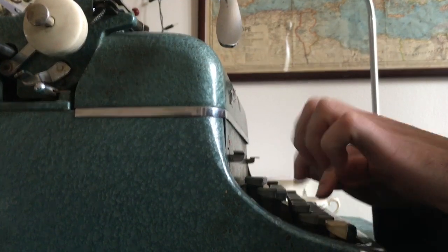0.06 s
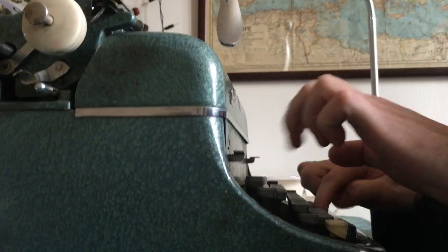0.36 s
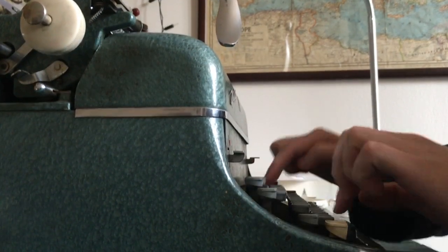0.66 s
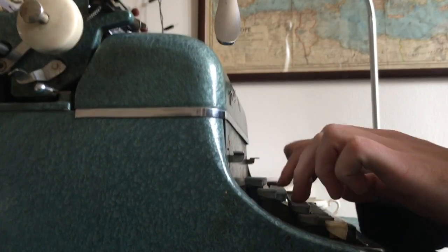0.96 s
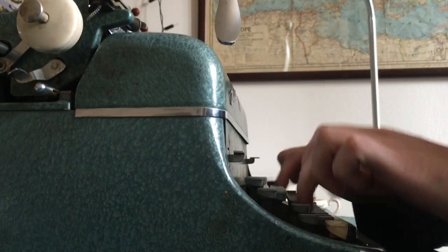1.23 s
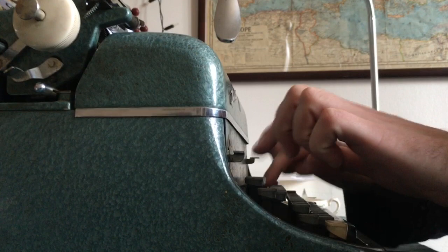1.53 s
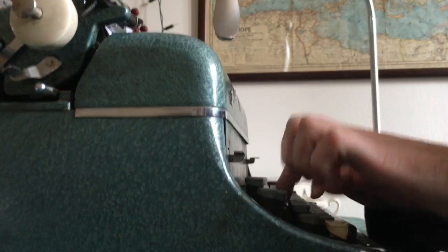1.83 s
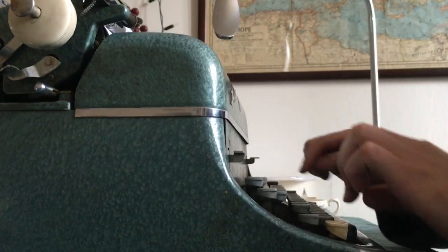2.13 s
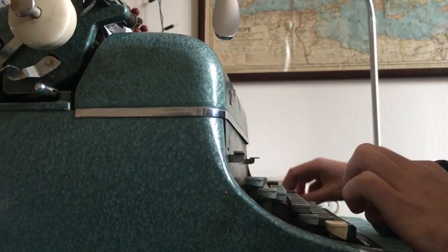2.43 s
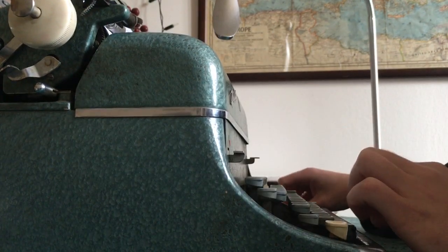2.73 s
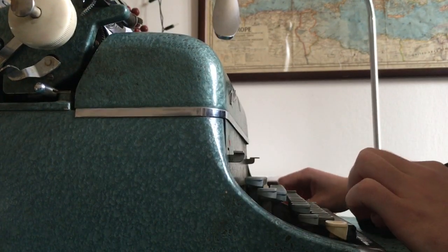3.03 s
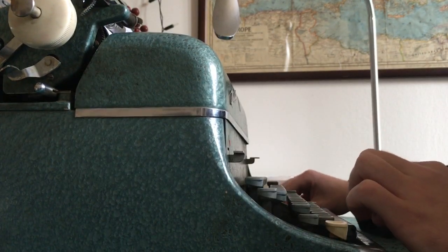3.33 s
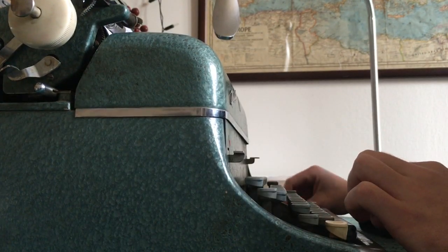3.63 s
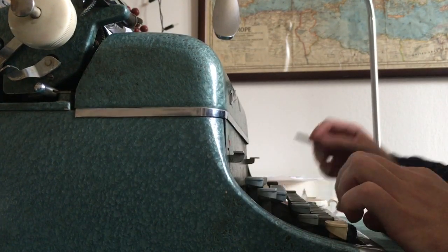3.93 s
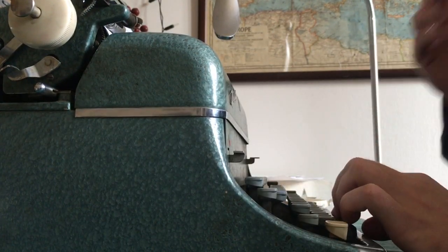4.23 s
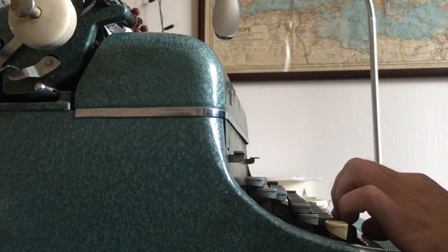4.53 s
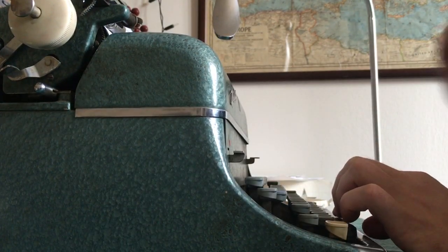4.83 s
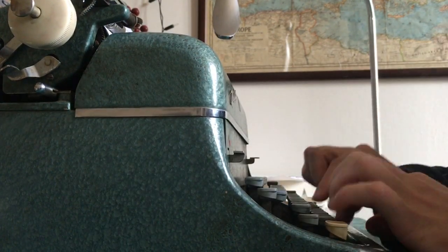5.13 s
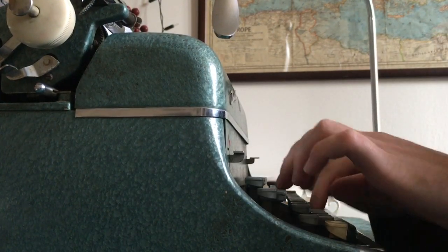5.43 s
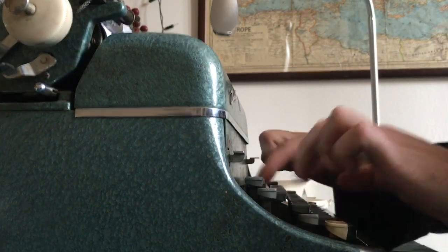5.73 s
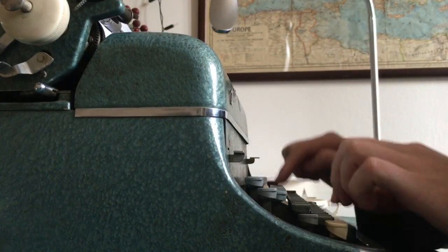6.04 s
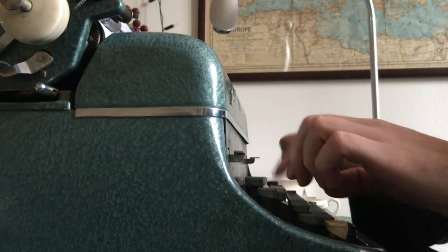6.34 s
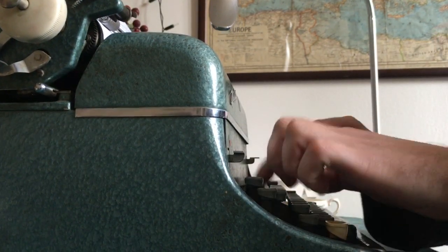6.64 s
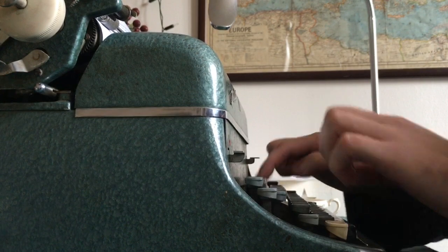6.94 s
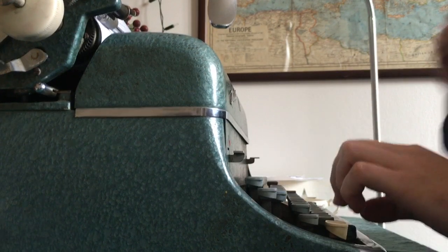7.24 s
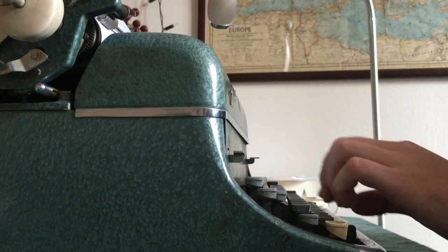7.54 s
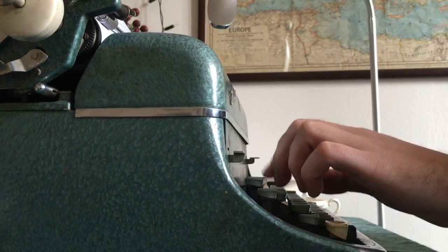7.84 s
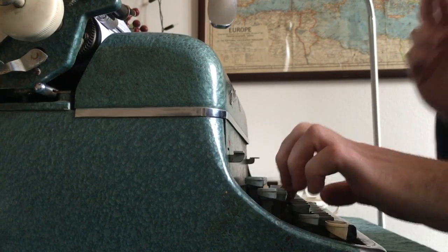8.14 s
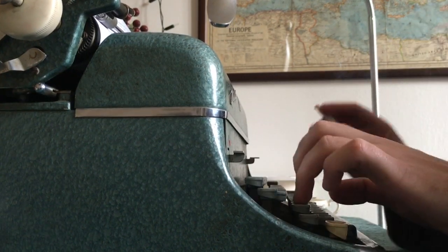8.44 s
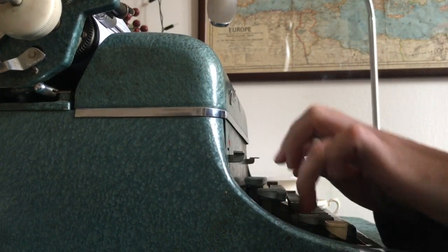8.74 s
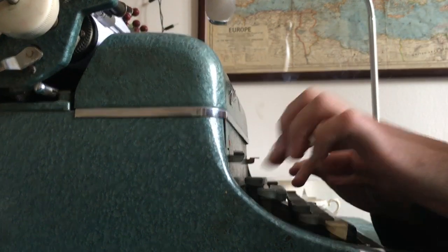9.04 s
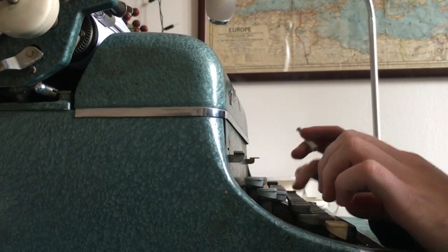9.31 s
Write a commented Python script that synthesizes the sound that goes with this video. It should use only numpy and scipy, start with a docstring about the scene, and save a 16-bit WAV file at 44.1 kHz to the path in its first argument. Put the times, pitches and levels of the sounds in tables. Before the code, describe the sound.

A heavy manual typewriter is heard close up in a small, quiet room. Keys snap sharply in an uneven burst, each with a light metal rattle and a low thump through the desk. A soft knock falls in a pause of about three seconds. Then a space bar thud leads into more typing, which slows to a few separate strokes. A faint, high metallic ring lingers underneath.

```python
"""Sharp slaps of two-finger typing: a heavy manual typewriter on a desk in a small, quiet room,
the microphone close beside it. For each letter a finger meets the key, the escapement swishes,
and the typebar slaps the platen and falls back. The space bar thuds and lets the carriage jump.
Underneath, the blows rock the case on the desk and shake the margin bell into a faint beating ring."""
import sys
import numpy as np
from scipy import signal
from scipy.fft import rfft, irfft
from scipy.io import wavfile

SR = 44100
rng = np.random.default_rng(int(sys.argv[2]) if len(sys.argv) > 2 else 0)


def file_out(sig):
    """Save sig as 16-bit WAV at sys.argv[1]."""
    # one column per channel
    cols = np.atleast_2d(sig).T
    # limit, then scale
    lim = np.clip(cols, -1, 1)
    pcm = np.round(lim * 32767).astype(np.int16)
    wavfile.write(sys.argv[1], SR, pcm)


N = 422037
BLOW_SAMPLES = 32768
AGE_S = np.arange(BLOW_SAMPLES) / SR
BIN_HZ = np.maximum(np.arange(BLOW_SAMPLES // 2 + 1) * SR / BLOW_SAMPLES, 1)

# Levels in the tables are relative; each layer adds its own gain.
# typebar strikes on the platen: start_s, level_db, key_travel_s, fall_back_s
LETTERS = [(-0.11, 1.5, 0.014, 0.11), (0.1087, -3, 0.04, 0.089), (0.3586, 1, 0.036, 0.11),
           (0.4895, -2, 0.025, 0.088), (0.7391, 1.5, .016, .122), (1.2862, 1, 0.035, 0.13),
           (1.3893, -2, 0.055, 0.11), (1.632, 1, 0.026, 0.092), (1.7501, -3, .028, 0.1),
           (1.9276, 0.5, .022, 0.096), (5.605, 2.5, .041, 0.12), (5.7399, -1.5, .025, 0.12),
           (5.898, -0.5, 0.02, 0.084), (6.392, 0, .029, .11), (6.588, 1, 0.018, 0.11),
           (6.794, 0, 0.023, 0.12), (7.1066, -1, .026, 0.088), (8.259, -0.5, 0.031, 0.13),
           (8.765, -1, 0.04, 0.15), (9.057, -0.5, 0.022, 0.12)]
# space bar meeting its stop: start_s, level_db, held_s
SPACES = [(0.8557, 1, 0.089), (5.216, 0.5, 0.093), (6.049, -4, .088)]
# a key knocking without printing: start_s, level_db
NUDGES = [(2.52, -18.5), (2.572, -23)]
# stray ticks while the hands rest: start_s, thin_db, knock_db
STRAY_TICKS = [(4.452, -51, -81), (7.951, -77, -58), (8.097, -87, -64), (8.486, -58, -72)]
# strokes that shake the bell anew: start_s, hum_db, upper_partial_db, beat_depth (0-1)
BELL_SHAKES = [(-0.11, -42.5, -55.5, 0), (.358, -41.5, -63.5, .1), (1.286, -55.5, -45, .2),
               (1.928, -55, -51.5, .5), (5.605, -52, -51.5, .35), (6.392, -46, -51.5, 0.5),
               (7.109, -61.5, -61.5, 0), (8.259, -59.5, -56.5, 0), (8.765, -43.5, -58, .05)]
# margin bell partials: pitch_hz, beat_hz, t60_s
BELL_PARTIALS = [(2722, 4.1, 5.6), (6444, 5, 1.9)]

# ringing modes of each part: pitch_hz, level_db, t60_s
CASE_MODES = [(57, -1.5, 0.57), (110.4, -2, 0.4), (158.4, -4.5, .2), (203.5, -2.5, 0.3), (242, -6.5, 0.2),
              (314.7, -1, 0.47), (414, -8, .3), (443.5, -4, 0.3), (608.2, -3, .2), (770, -22.5, 1.4),
              (847, -9, 0.43)]  # case and desk together
NUDGE_MODES = [(170, -8.5, 0.41), (307, -0.5, 0.33), (338.4, 4, 0.16), (1000, 10.5, 0.05), (1287, -2, 0.13),
               (2250, 0, 0.12)]  # the nudged key's lever
BAR_MODES = [(160.2, -1, 0.14), (319, -7, 0.46), (797, -6.5, 0.076), (1042, -3.5, 0.074), (1237, 11.5, .09),
             (1440, 0, 0.13), (1600, -3.5, 0.092), (2300, 3.5, .12)]  # space bar
RACK_MODES = [(2230, -0.5, 0.13), (2389, -7.5, .08), (3050, 9.5, 0.029), (3150, 4, 0.025),
              (4190, 5.5, 0.036), (5150, -4.5, .06), (6940, -11, .05), (7360, -6, .05),
              (8400, -19.5, 0.046), (11200, -3.5, .07), (11500, -15, .06), (11900, -14, .06),
              (13600, -9, 0.0567)]  # carriage rack
LEVER_MODES = [(1310, -5.5, .05), (1450, -1.5, .06)]  # key lever
TYPEBAR_MODES = [(800, -7.5, 0.055), (973, -6, 0.035), (1220, -0.5, 0.074), (1420, -2, .06),
                 (1687, -0.5, 0.068), (1860, -6.5, 0.034)]  # typebars and their segment

# noise spectra at the microphone: frequency_hz, level_db
ROOM_TONE = [(20, -34), (35, -12), (59, 1), (100, -6), (145, -12), (236, -3.5), (310, -10), (520, -17.5),
             (900, -19.5), (2000, -24.5), (4000, -30.5), (12500, -35.5), (16000, -40)]  # the quiet room
DESK_BOOM = [(22, -18), (38, -4), (58, -3.5), (85, 0.5), (150, -8.5), (300, -8), (500, -6), (1000, -42.5)]  # case rocking on the desk
LINK_TICK = [(800, -28.5), (3000, -18), (7000, -8), (11500, 6), (15500, -2.5)]  # loose links
KEY_KNOCK = [(100, -13), (330, 2), (550, 1), (1100, -5.5), (3000, -4.5), (5000, -18), (8000, -18.5),
             (15000, -27)]  # nudged key
BAR_THUD = [(100, 0.5), (400, -4), (750, 4), (1300, -6), (2200, -5.5), (4000, -13), (7500, -15.5),
            (15000, -25)]  # space bar on its stop
RACK_KNOCK = [(100, 4.5), (500, 2.5), (1300, 1), (2300, -5.5), (3700, -3), (5000, -10.5), (8000, -10.5),
              (15000, -15)]  # carriage rack and frame
LEVER_TAP = [(200, -14.5), (750, -0.5), (1050, -28), (1350, -1), (1700, -16.5), (4000, -19.5), (15000, -26)]  # finger on a key
SWISH = [(200, -3.5), (1200, 4.5), (2800, -10.5), (6000, -5.5), (12000, -1.5), (15500, -7)]  # escapement and swinging typebar
BASKET_RATTLE = [(100, 5.5), (350, -4), (550, -11), (800, 3.5), (1350, -4.5), (2800, -13.5), (6000, -20),
                 (15000, -22)]  # typebar landing
CARRIAGE_CLACK = [(100, -20), (450, -19.5), (750, 0.5), (1200, -3), (2000, 2.5), (3000, -4.5), (6000, -7.5),
                  (15000, -31.5)]  # carriage after a letter
TYPE_SLAP = [(400, -25), (1200, -8), (3000, -11.5), (4400, -1), (6400, 2), (7600, -5), (10000, -2.5),
             (15500, -14.5)]  # type on the platen

# panel and typebar resonances that colour every blow: centre_hz, width_hz, gain_db
PANEL_RESONANCES = [(509, 53, -13.5), (1175, 200, 5), (1439, 92, 5), (1585, 90, -7), (1650, 70, 3.5),
                    (3470, 140, 3.5), (4480, 160, 5), (5350, 140, 3.5), (6700, 260, 1), (9800, 130, 1.5),
                    (10320, 440, -8)]
# ring of frame and room together: frequency_hz, t60_s
RING_TIMES = [(50, 0.81), (250, .65), (800, .5), (2000, 0.54), (5500, 0.34), (9000, .33), (15000, 0.19)]
# early echoes off nearby surfaces: delay_s, gain, lowpass_hz
ROOM_ECHOES = [(.0098, .35, 14000), (.0108, .8, 7500), (.0148, .35, 8000)]

STRENGTH_SHARE = .3  # share of a stroke's level_db passed to clack, desk thump and typebar landing
TOOTH_DETUNE, TYPEBAR_DETUNE = .015, .025  # each rack tooth and typebar rings slightly off pitch


def from_db(db):
    """Decibels to amplitude."""
    return 10 ** (np.asarray(db) / 20)


def unit_rms(x):
    """Scale a signal to an RMS of one."""
    return x / np.sqrt(np.mean(x ** 2) + 1e-20)


def spectrum_db(spectrum, hz):
    """A spectrum's level at hz, interpolated over log frequency."""
    points_hz, level_db = np.transpose(spectrum)
    return np.interp(np.log(hz), np.log(points_hz), level_db)


def decay(t60_s, age_s=AGE_S):
    """A fade that loses 60 dB in t60_s."""
    return np.exp(-np.log(1000) * age_s / t60_s)


def add(track, start_s, sound):
    """Mix a sound in, as far as it falls inside the track."""
    start = round(start_s * SR)
    part = sound[max(-start, 0):max(N - start, 0)]
    track[max(start, 0):max(start, 0) + len(part)] += part


def echoes(crack):
    """Hard surfaces nearby return a crack to the microphone a moment later, a little duller."""
    out = 0
    for delay_s, gain, lowpass_hz in ROOM_ECHOES:
        delayed = np.pad(crack, (round(delay_s * SR), 0))[:len(crack)]
        out += gain * signal.lfilter(*signal.butter(2, lowpass_hz, fs=SR), delayed)
    return out


def blows(hits, spectrum, gain_db, rise_s, t60_s, tail_db, alike, echo=0):
    """Each hit (start_s, level_db) wakes countless close modes: a crack, then a darkening ring."""
    panels_db = sum(db / (1 + (2 * (BIN_HZ - hz) / width) ** 2) for hz, width, db in PANEL_RESONANCES)
    colour = unit_rms(from_db(spectrum_db(spectrum, BIN_HZ) + panels_db))
    band_hz, band_t60_s = np.transpose(RING_TIMES)
    bands = np.array([colour * np.interp(np.log(BIN_HZ), np.log(band_hz), row)
                      for row in np.eye(len(band_hz))])
    tail_fades = from_db(tail_db) * np.array([decay(t60) for t60 in band_t60_s])
    onset = 1 - np.exp(-AGE_S / rise_s)
    common = rng.standard_normal(BLOW_SAMPLES)
    out = np.zeros(N)
    for start_s, level_db in hits:
        fresh = rng.standard_normal(BLOW_SAMPLES)
        # the same part is struck each time, so the share `alike` of the crack repeats
        noise = np.sqrt(alike) * common + np.sqrt(1 - alike) * fresh
        crack = irfft(colour * rfft(noise)) * decay(t60_s) * onset
        if echo:
            crack += echo * echoes(crack)
        tail = (irfft(bands * rfft(fresh[::-1])) * tail_fades).sum(axis=0) * onset
        add(out, start_s, from_db(level_db + gain_db) * (crack + tail))
    return out


def ringing(hits, modes, gain_db, detune=0, scatter_db=2.5):
    """Each hit (start_s, level_db) rings every mode at a random strength, off pitch if detuned."""
    pitch_hz, mode_db, t60_s = np.transpose(modes)
    fades = np.array([decay(t60) for t60 in t60_s])
    signs = (-1) ** np.arange(len(modes))
    out = np.zeros(N)
    for start_s, level_db in hits:
        strength, drift = rng.standard_normal((2, len(modes)))
        waves = fades * np.sin(2 * np.pi * np.outer(pitch_hz * (1 + detune * drift), AGE_S))
        gains = signs * from_db(gain_db + level_db + mode_db + scatter_db * strength)
        add(out, start_s, gains @ waves)
    return out


def bouncing(hits, gap_s, loss_db, count):
    """A part strikes several times at uneven gaps, each hit loss_db softer, or harder if negative."""
    gaps_s = gap_s * rng.uniform(.5, 1.5, (len(hits), count))
    return [(s + row[:k].sum(), db - k * loss_db)
            for (s, db), row in zip(hits, gaps_s) for k in range(count)]


def slowness(usual_travel_s=.025):
    """How slowly each key is pressed, in doublings of the usual travel time."""
    return np.log2(np.array(LETTERS)[:, 2] / usual_travel_s)


def key_touches():
    """Hits of finger on key, one travel time before the strike; a quick jab lands harder."""
    strike_s, _, travel_s, _ = np.transpose(LETTERS)
    return np.c_[strike_s - travel_s, -33 - 6.5 * slowness()]


def typebar_falls():
    """Hits of the typebars dropping back into their basket."""
    strike_s, level_db, _, fall_back_s = np.transpose(LETTERS)
    return np.c_[strike_s + fall_back_s, -36 + STRENGTH_SHARE * level_db]


def carriage_jolts(jump_db=2, rebound_s=.042, shrink=.87):
    """After a space the carriage hits the next tooth, then rebounds ever sooner and more lightly."""
    rebound = np.arange(4)
    after_s = np.r_[0, np.cumsum(rebound_s * shrink ** rebound)]
    level_db = np.r_[jump_db, -3 - 2 * rebound]
    return np.vstack([np.c_[s + held_s + after_s, level_db] for s, _, held_s in SPACES])


def room_tone(gain_db=-66.5):
    """The faint rumble and hiss of a quiet room."""
    hz = np.maximum(np.arange(N // 2 + 1) * SR / N, 1)
    spectrum = rfft(rng.standard_normal(N)) * from_db(spectrum_db(ROOM_TONE, hz))
    return from_db(gain_db) * unit_rms(irfft(spectrum, N))


def margin_bell():
    """Each partial is a close pair that beats slowly and rings on until the next shake."""
    shake_s, hum_db, upper_db, beat_depth = np.transpose(BELL_SHAKES)
    t = np.arange(N) / SR
    latest = np.maximum(np.searchsorted(shake_s, t, side="right") - 1, 0)
    age_s = t - shake_s[latest]
    out = np.zeros(N)
    for (pitch_hz, beat_hz, t60_s), level_db in zip(BELL_PARTIALS, (hum_db, upper_db)):
        beating = 1 + beat_depth[latest] * np.exp(2j * np.pi * beat_hz * age_s)
        swing = from_db(level_db[latest]) * decay(t60_s, age_s) * beating
        swing = signal.lfilter([.01], [1, -.99], swing)  # no click at a new shake
        out += (swing * np.exp(2j * np.pi * pitch_hz * t)).imag
    return out


def desk():
    """Every stroke rocks the case on the desk, and again as the key comes back."""
    hits = [(s - .003, 4 + STRENGTH_SHARE * db) for s, db, _, _ in LETTERS]
    hits += [(s, db + 3) for s, db, _ in SPACES]
    hits += [(s, db - 8) for s, db in NUDGES]
    hits += [(s, db + 36.5) for s, db in typebar_falls()]
    hits += [(s, db - 3) for s, db in carriage_jolts()]
    hits += [(s, db + 27) for s, db in key_touches()]
    boom = blows(hits, DESK_BOOM, gain_db=-40, rise_s=.013, t60_s=.052, tail_db=2, alike=.15)
    return boom + ringing(hits, CASE_MODES, gain_db=-40.5)


def linkage():
    """Loose links tick as a key takes up its slack and as it is let go; the frame knocks along."""
    take_ups = [(s - .022, -47, -36.5) for s, _ in key_touches()]
    let_gos = [(s - .041, -37, -25) for s, _ in typebar_falls()]
    bar_take_ups = [(s - .021, -57, -46.5) for s, _, _ in SPACES]
    start_s, thin_db, knock_db = np.transpose(take_ups + let_gos + bar_take_ups + STRAY_TICKS)
    thin = blows(np.c_[start_s, thin_db], LINK_TICK, gain_db=.5,
                 rise_s=.00062, t60_s=.035, tail_db=-22, alike=.24)
    knock = blows(np.c_[start_s, knock_db], RACK_KNOCK, gain_db=1.5,
                  rise_s=.0021, t60_s=.027, tail_db=-14.5, alike=.25)
    return thin + knock


def nudged_key():
    """A soft, hollow double knock from a key that prints nothing."""
    knock = blows(NUDGES, KEY_KNOCK, gain_db=-10.5, rise_s=.0011, t60_s=.025, tail_db=-18, alike=.23)
    return knock + ringing(NUDGES, NUDGE_MODES, gain_db=-26)


def space_bar(bounce_s=.02, bounce_db=-12.5):
    """The thumb rings the lever, then the bar knocks hollowly on its stop and bounces once."""
    stops = np.array(SPACES)[:, :2]
    touches = stops - [.024, 0]
    knocks = np.vstack([stops, stops + [bounce_s, bounce_db]])
    thumb = blows(touches, LEVER_TAP, gain_db=-40, rise_s=.002, t60_s=.063, tail_db=-17, alike=.3)
    thumb += ringing(touches, LEVER_MODES, gain_db=-38.5)
    thud = blows(knocks, BAR_THUD, gain_db=-11,
                 rise_s=.0031, t60_s=.051, tail_db=-17.5, alike=.1, echo=.12)
    return thumb + thud + ringing(knocks, BAR_MODES, gain_db=-30.5)


def carriage_jump():
    """As the space bar comes up, the carriage slides one step and rattles its rack brightly."""
    slide = blows(carriage_jolts() - [.004, 0], RACK_KNOCK, gain_db=-22,
                  rise_s=.0045, t60_s=.046, tail_db=-22.5, alike=0)
    jolts = bouncing(carriage_jolts(), gap_s=.0091, loss_db=4, count=3)
    rack = blows(jolts, RACK_KNOCK, gain_db=-17.5, rise_s=.0004, t60_s=.023, tail_db=-14.5, alike=.4)
    return slide + rack + ringing(jolts, RACK_MODES, gain_db=-32.5, detune=TOOTH_DETUNE)


def key_levers():
    """A finger taps each key and sets its lever ringing."""
    touches = key_touches()
    tap = blows(touches, LEVER_TAP, gain_db=3.5, rise_s=.0012, t60_s=.13, tail_db=-19.5, alike=.21)
    return tap + ringing(touches, LEVER_MODES, gain_db=-.5, detune=TYPEBAR_DETUNE)


def escapement():
    """The typebar swings up and the escapement swishes, louder when a slow press drags it."""
    strike_s, level_db, _, _ = np.transpose(LETTERS)
    swing = blows(np.c_[strike_s - .025, level_db], SWISH, gain_db=-31.5,
                  rise_s=.008, t60_s=.09, tail_db=-28.5, alike=0)
    drag = blows(np.c_[strike_s - .0085, 2 * slowness()], SWISH, gain_db=-16.5,
                 rise_s=.004, t60_s=.061, tail_db=-22, alike=.26)
    return swing + drag


def typebar_clatter():
    """The carriage clacks at the strike; the typebar rings, then rattles to rest in its basket."""
    strike_s, level_db, _, _ = np.transpose(LETTERS)
    clacks = np.c_[strike_s + .0015, STRENGTH_SHARE * level_db]
    clack = blows(clacks, CARRIAGE_CLACK, gain_db=-18.5,
                  rise_s=.0022, t60_s=.05, tail_db=-11, alike=.81, echo=.33)
    landings = bouncing(typebar_falls(), gap_s=.012, loss_db=2.5, count=4)
    basket = blows(landings, BASKET_RATTLE, gain_db=5.5,
                   rise_s=.00033, t60_s=.082, tail_db=-14, alike=.091)
    strike_ring = ringing(clacks, TYPEBAR_MODES, gain_db=-24, detune=TYPEBAR_DETUNE)
    landing_ring = ringing(landings, TYPEBAR_MODES, gain_db=-10, detune=TYPEBAR_DETUNE)
    return clack + basket + strike_ring + landing_ring


def type_on_platen():
    """The type meets ribbon and paper, then the platen, in one hard snap that rings the frame."""
    strike_s, level_db, _, _ = np.transpose(LETTERS)
    snaps = bouncing(np.c_[strike_s - .0003, level_db], gap_s=.0011, loss_db=-3.5, count=2)
    slap = blows(snaps, TYPE_SLAP, gain_db=-7,
                 rise_s=.0004, t60_s=.008, tail_db=-44.5, alike=.093, echo=.76)
    frame = blows(np.c_[strike_s + .001, level_db], TYPE_SLAP, gain_db=-21,
                  rise_s=.00039, t60_s=.042, tail_db=-3, alike=.25)
    # small springs keep shimmering after the frame is still
    springs = blows(np.c_[strike_s, level_db], TYPE_SLAP, gain_db=-48.5,
                    rise_s=.01, t60_s=.94, tail_db=-32.5, alike=0)
    return slap + frame + springs


def scene():
    """Typewriter and room in mono, from close beside the machine."""
    letters = key_levers() + escapement() + type_on_platen() + typebar_clatter()
    spaces = space_bar() + carriage_jump()
    return (letters + spaces + nudged_key() + linkage() + desk() + margin_bell() + room_tone())[None]


def record(dry):
    """The microphone loses the deepest bass; the highest peaks are rounded, the top is cut."""
    ceiling, low_cut_hz, high_cut_hz = .75, 35, 15900
    heard = signal.sosfilt(signal.butter(6, low_cut_hz, "high", fs=SR, output="sos"), dry)
    rounded = ceiling * np.tanh(heard / ceiling)
    return signal.sosfilt(signal.ellip(10, .1, 80, high_cut_hz, fs=SR, output="sos"), rounded)


dry = scene()
out = record(dry)
file_out(out)
```